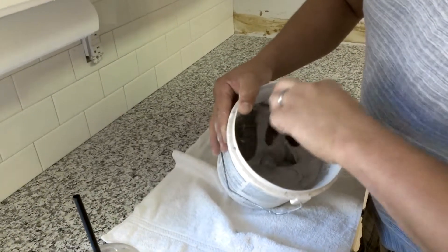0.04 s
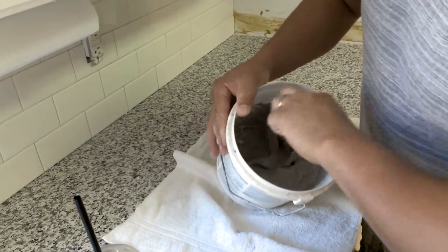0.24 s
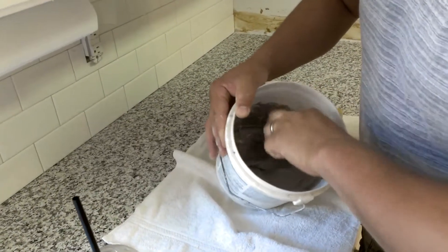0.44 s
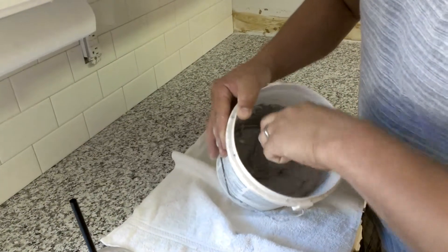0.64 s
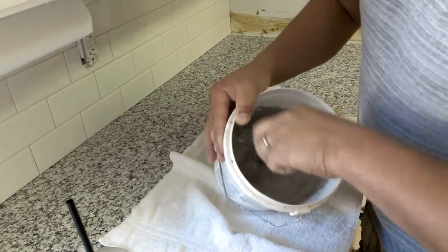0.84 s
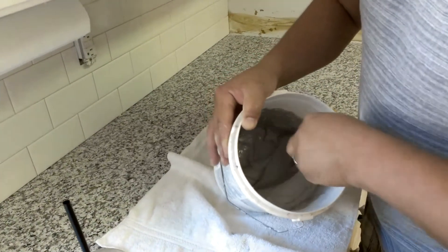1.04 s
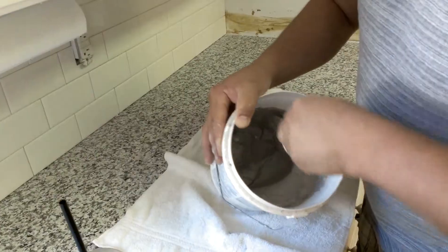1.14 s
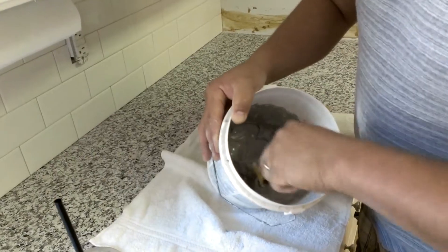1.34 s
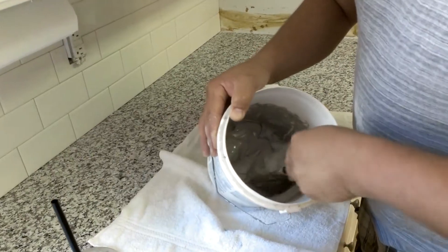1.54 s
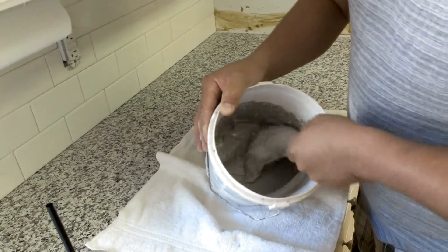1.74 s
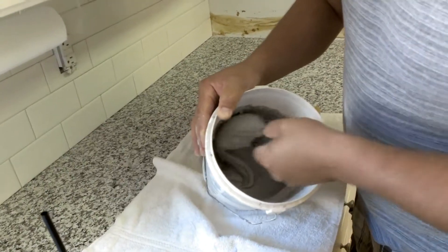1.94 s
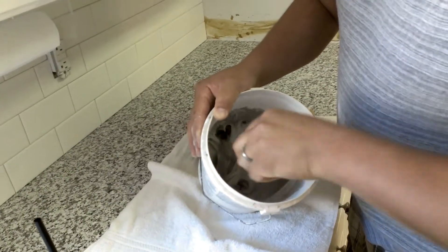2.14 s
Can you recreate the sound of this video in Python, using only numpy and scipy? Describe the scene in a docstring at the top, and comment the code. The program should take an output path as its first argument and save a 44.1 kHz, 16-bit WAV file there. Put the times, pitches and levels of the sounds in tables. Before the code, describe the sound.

Close stereo pickup of thick sandy paste being stirred in a plastic bucket; the blade clacks and rasps briefly, stops, then drags steadily with low churning and a final small knock, over very quiet room air.

```python
"""Grout stirred in a bucket

A metal spatula stirs thick grout in a small plastic bucket on a kitchen counter. The blade clacks as ringing
modes, then drags sand over the plastic in short strokes: random clicks through wall resonances. Coarse grains
snag in showers of cracks, grit crunches, and low thuds and one higher knock ring with the bucket's modes.
Behind lie a small hard room of decaying noise echoes, quiet air noise and a faint two-tone mains hum."""
import sys
import numpy as np
from scipy import signal
from scipy.fft import rfft, irfft, next_fast_len
from scipy.io import wavfile
from scipy.ndimage import uniform_filter1d

SR = 44100
rng = np.random.default_rng(int(sys.argv[2]) if len(sys.argv) > 2 else 0)


def transcribe(signal):
    """Save signal, clipped to [-1, 1], as a 16-bit WAV file at the path in sys.argv[1]."""
    frames = np.atleast_2d(signal).T
    limited = np.clip(frames, -1, 1)
    pcm = np.round(limited * 32767).astype(np.int16)
    wavfile.write(sys.argv[1], SR, pcm)


N = 97020
TIME = np.arange(N) / SR
GRAINS_PER_S, SAND_PER_S, LUMPS_PER_S = 2200, 4400, 610   # mean rates of random clicks
BUCKET_ECHO_T60_S = 0.027

# Strokes of the blade, levels before the layer gains:
# (time [s], rasp on the wall [dB], churning of the paste [dB], hiss of fine sand [dB])
STROKE_LEVELS = [
    [(0, -33, -38, -48), (.014, -38, -43, -58), (.07, -62.5, -57.5, -69)],
    [(.174, -47, -52, -55.5), (.19, -44.5, -42, -49.5), (.243, -38.5, -55, -46.5), (.248, -21.5, -32, -33),
     (.266, -11, -36, -35), (.285, -16.5, -26.5, -27.5), (.332, -20.5, -30, -35.5),
     (.366, -18, -22.5, -32.5), (.415, -20, -27, -35), (.452, -24, -34.5, -36), (.475, -30, -25.5, -45),
     (.519, -32, -32, -49), (.526, -23, -21.5, -40.5), (.558, -27.5, -24.5, -51), (.61, -53, -40, -65),
     (.67, -71.5, -77.5, -80)],
    [(1.429, -68, -26.5, -82), (1.432, -26.5, -26.5, -41.5), (1.52, -22, -22.5, -42),
     (1.562, -24.5, -26, -37.5), (1.64, -23.5, -36, -41), (1.68, -20, -35, -36.5),
     (1.704, -22, -22.5, -39.5), (1.735, -22.5, -34.5, -36), (1.754, -19, -24, -33.5),
     (1.78, -23.5, -28.5, -36.5), (1.826, -23.5, -27, -37.5), (1.88, -24, -27.5, -37.5),
     (1.935, -23.5, -30, -42), (1.994, -37, -39.5, -52), (2.012, -58, -64, -57), (2.11, -62, -63, -67.5)],
    [(2.129, -67, -57, -51), (2.133, -24.5, -26.5, -43), (2.16, -38, -32, -43), (2.175, -25.5, -37, -37),
     (2.2, -46, -32, -59)],
]
# The gap behind the blade opens and closes, tuning the paste: (time [s], resonance [Hz])
GAP_GLIDE = [(.28, 281), (.36, 460), (.43, 325), (.54, 420.7), (1.52, 390), (1.58, 313), (1.66, 395),
             (1.87, 471)]
GAP_WIDTH_HZ, BODY_DB = 56, -3.5   # BODY_DB: bucket body against gap
RASP_DB, PASTE_DB, SAND_DB = -3.5, -2.5, 1.9
JUDDER_HZ, JUDDER_DB = 88, 1.5     # stick and slip of the blade
SAND_ECHO_DB = 1                   # the hiss bounces round inside the bucket


def stroke_gains():
    """Rasp, paste and sand gains follow each stroke's levels and are silent between strokes."""
    gains = 0
    for stroke in STROKE_LEVELS:
        s, *columns = np.transpose(stroke)
        active = (TIME >= s[0]) * (TIME <= s[-1])
        gains = gains + np.array([from_db(np.interp(TIME, s, db)) for db in columns]) * active
    return gains


def churning_paste():
    """Random lumps push the bucket's body and a gliding gap resonance."""
    body = rms_one(ring(grains(LUMPS_PER_S, spread_db=2), BUCKET_BODY))
    gap = rms_one(gliding(grains(LUMPS_PER_S, spread_db=2), GAP_GLIDE, GAP_WIDTH_HZ))
    return evened(coloured(from_db(BODY_DB) * body + gap, PASTE_COLOUR), size=1100)


def stirring():
    """Grains slip under the juddering blade and rasp the wall; paste churns in the bucket; fine sand hisses."""
    rasp_gain, paste_gain, sand_gain = stroke_gains()
    judder = from_db(JUDDER_DB * wander(JUDDER_HZ))
    coarse = grains(GRAINS_PER_S, spread_db=1.5)
    rasp = evened(wall(focused(coarse * judder)), size=900)

    fine = (coarse + grains(SAND_PER_S, spread_db=0)) * judder
    bounced = from_db(SAND_ECHO_DB) * echoes(fine, BUCKET_ECHO_T60_S, 0)
    sand = evened(sandy(fine + bounced), size=900)

    out = from_db(RASP_DB) * rasp_gain * rasp
    out = out + from_db(SAND_DB) * sand_gain * sand
    return out + from_db(PASTE_DB) * paste_gain * churning_paste()


# Resonances of the wall under the blade: (frequency [Hz], width [Hz], mean level [dB])
WALL_RESONANCES = [(942, 160, -1.5), (1201.5, 62, 1), (1282, 63, 0.5), (1468, 232, -2.5), (1794, 152, -0.5),
                   (2102, 160, -1), (2438, 188, 2), (2603, 407, -5.5)]
# Colour of the rasp: (frequency [Hz], gain [dB])
RASP_COLOUR = [(100, -26), (300, -12), (750, 0.5), (1500, -3.5), (2500, -1), (3200, -1.5), (4500, -12.5),
               (8000, -30), (16000, -50)]
WALL_SHIFT_DB, WALL_SHIFT_HZ = 2.5, 7.04   # each resonance swells and fades as the blade travels


def wall(x):
    """The broad resonances of the plastic wall, each driven more or less as the blade moves on."""
    out = 0
    for k, (hz, width, db) in enumerate(WALL_RESONANCES):
        gain = from_db(db + WALL_SHIFT_DB * wander(WALL_SHIFT_HZ))
        sign = (-1) ** k   # neighbours alternate in polarity
        out = out + sign * gain * signal.lfilter(*resonance(hz, width), x + 1e-18)
    return coloured(out, RASP_COLOUR)


# Resonance of the rasp, lower as the blade buries itself in paste: (time [s], centre [Hz])
RASP_GLIDE = [(0, 1250), (.179, 2070), (.273, 2050), (.318, 1690), (.6, 1187), (1.62, 1796), (1.89, 1700),
              (1.945, 1190)]
FOCUS_WIDTH_HZ, FOCUS_DB = 890, 11


def focused(x):
    """A broad resonance that glides with the blade's depth lifts part of the rasp."""
    return x + from_db(FOCUS_DB) * gliding(x, RASP_GLIDE, FOCUS_WIDTH_HZ)


# Colour of cracking sand: (frequency [Hz], gain [dB])
SAND_COLOUR = [(500, -26.5), (2500, 5.5), (4100, 5), (5400, 0.5), (6500, -6), (8200, -3), (9800, -9.5),
               (11500, -15.5), (15500, -28)]


def sandy(x):
    """The bright colour of cracking sand."""
    return coloured(x, SAND_COLOUR)


# The blade's edge chatters and a patch of wall groans:
# one list per groan of (time [s], centre [Hz], level before GROAN_DB [dB])
GROAN_GLIDES = [
    [(.29, 1543, -16.5), (.365, 1520, -63), (.379, 1616, -16), (.42, 1560, -34.5)],
    [(1.44, 940, -33), (1.62, 870, -39.5), (1.77, 1047, -28.5), (1.93, 965, -30.5), (2.05, 884, -51.5)],
    [(1.915, 1360, -38), (1.934, 1348, -29.5), (2.07, 1210, -60)],
]
GROAN_WIDTH_HZ, GROAN_DB = 52, -1.5


def groans():
    """Slipping grains drive one narrow, gliding resonance of the wall into a rough tone."""
    out = 0
    for rows in GROAN_GLIDES:
        s, hz, db = np.transpose(rows)
        narrow = gliding(grains(GRAINS_PER_S, spread_db=0.5), rows, GROAN_WIDTH_HZ)
        tone = gliding(narrow, rows, FOCUS_WIDTH_HZ)
        level = from_db(GROAN_DB + np.interp(TIME, s, db)) * (TIME >= s[0]) * (TIME <= s[-1])
        out = out + level * evened(tone, size=600)
    return out


# The blade clacks against the wall: (time [s], strike level [dB])
CLACK_HITS = [(.2450, -7), (.2536, -6.5), (.2607, -5), (.2644, -5.5), (.2872, -16), (.4557, -17.5)]
# Blade pressed on the wall: (frequency [Hz], level [dB], time to fall 60 dB [s])
PRESSED_BLADE = [(1500, -14, .1), (2007, -17.5, .09), (2090, -22.5, 0.16), (2368, -9, 0.11),
                 (2470, 0.5, 0.012), (2810, -16.5, 0.05)]
CLACK_DB, CLACK_TICK_DB = 0.5, -24.5


def clacks():
    """Hard touches ring the blade and crack the sand under it."""
    hits = clicks(CLACK_HITS)
    blade = from_db(CLACK_DB) * blade_band(ring(hits, PRESSED_BLADE))
    return blade + from_db(CLACK_TICK_DB) * crumbling(hits, sandy)


BLADE_LOW_HZ, BLADE_HIGH_HZ = 1750, 2973


def blade_band(x):
    """The thin blade radiates neither bass nor much treble."""
    band = signal.butter(2, [BLADE_LOW_HZ, BLADE_HIGH_HZ], "band", fs=SR, output="sos")
    return signal.sosfilt(band, x + 1e-18)


# The blade snags on a coarse grain: (time [s], level [dB])
SNAG_HITS = [(.364, -13), (.3755, -6.5), (.523, -21.5), (1.431, -24.5), (1.509, -18.5), (1.781, -13.5),
             (1.921, -11), (2.1335, -29.5)]
SNAG_DB, SNAG_TICK_DB = -4, -15


def snags():
    """A coarse grain is crushed against the wall."""
    hits = clicks(SNAG_HITS)
    crush = from_db(SNAG_DB) * crumbling(hits, lambda x: wall(focused(x)))
    return crush + from_db(SNAG_TICK_DB) * crumbling(hits, sandy)


def crumbling(hits, shape, rise_s=.0005, decay_s=0.0062):
    """Each click sets off a swelling and dying shower of tiny cracks, heard through the given filter."""
    rise, fall = np.exp(-1 / (np.array([rise_s, decay_s]) * SR))
    envelope = signal.lfilter([1 - rise], np.convolve([1, -rise], [1, -fall]), hits + 1e-18)
    return envelope * evened(shape(grains(SAND_PER_S, spread_db=5.5)), size=220)


# Low thuds and one higher knock: (time [s], level [dB], ringing pitch [Hz])
THUD_HITS = [(0.463, -15.5, 374), (.548, -21.5, 419), (1.405, -43.5, 390), (1.753, -16.5, 411),
             (2.1347, -26, 488), (2.135, -16.5, 1360), (2.137, -21, 741)]
# Bucket with its load of paste: (frequency [Hz], level [dB], time to fall 60 dB [s])
BUCKET_BODY = [(245, -17.5, 0.24), (327.7, -6.5, 0.11), (378, -6, 0.062), (429.6, -0.5, 0.097),
               (473, -6.5, 0.013), (743, -9, 0.063)]
# Colour of the paste: (frequency [Hz], gain [dB])
PASTE_COLOUR = [(25, -36), (70, -12), (150, -8.5), (300, -3.5), (480, -0.5), (600, -3.5), (750, -0.5),
                (1200, -16), (4000, -44.5)]
THUD_DB, THUD_TONE_T60_S, THUD_TONE_DB = -6, 0.095, 4.5


def thuds():
    """Each hit rings a dying sine at its own pitch and pushes the bucket's low modes."""
    tones = 0
    for s, db, hz in THUD_HITS:
        tones = tones + ring(clicks([(s, db)]), [(hz, THUD_TONE_DB, THUD_TONE_T60_S)])
    body = ring(clicks([(s, db) for s, db, hz in THUD_HITS]), BUCKET_BODY)
    return from_db(THUD_DB) * coloured(tones + body, PASTE_COLOUR)


# A clump of grit is smeared along the wall: (time [s], level [dB], pitch [Hz])
GRIT_CLUMPS = [(0.546, -41.5, 9300), (1.551, -31.5, 3560), (1.602, -29.5, 3000), (1.748, -38, 6660),
               (1.836, -32, 4000), (1.871, -31.5, 2900)]
CLUMP_WIDTH_SHARE = 0.13   # resonance width over its pitch
CLUMP_RISE_S, CLUMP_DECAY_S, CLUMP_DB = 0.0011, 0.012, 1.5


def clumps():
    """Each clump of grit gives a short, bright crunch with a pitch of its own."""
    out = 0
    for s, db, hz in GRIT_CLUMPS:
        b, a = resonance(hz, CLUMP_WIDTH_SHARE * hz)
        pitched = lambda x: signal.lfilter(b, a, x + 1e-18)
        out = out + crumbling(clicks([(s, db)]), pitched, CLUMP_RISE_S, CLUMP_DECAY_S)
    return from_db(CLUMP_DB) * out


# The blade brushes the wall between strokes: (time [s], level [dB])
BRUSH_HITS = [(.9675, -44), (.972, -38), (1.147, -49.5), (1.403, -45)]
# The blade's tip, touched lightly: (frequency [Hz], level [dB], time to fall 60 dB [s])
BLADE_TIP = [(2010, -2, 0.036), (2570, -15, 0.059)]
BRUSH_DB, BRUSH_TICK_DB, TIP_DB = -6, -15, -5


def brushes():
    """Light, gritty touches that ring only the blade's tip."""
    hits = clicks(BRUSH_HITS)
    grit = from_db(BRUSH_DB) * crumbling(hits, lambda x: blade_band(wall(x)))
    ticks = from_db(BRUSH_TICK_DB) * crumbling(hits, sandy)
    return grit + ticks + from_db(TIP_DB) * blade_band(ring(hits, BLADE_TIP))


RUB_START_S, RUB_END_S, RUB_DB = .175, .245, -36.5   # a light rub just before the first clack


def rub():
    """Fine grains slide under the bare blade."""
    active = (TIME > RUB_START_S) * (TIME < RUB_END_S)
    slide = blade_band(wall(grains(SAND_PER_S, spread_db=1)))
    return from_db(RUB_DB) * active * evened(slide, size=900)


# Colour of the room air: (frequency [Hz], gain [dB])
AIR_COLOUR = [(25, -29), (50, -2), (330, 1.5), (500, -9), (1300, -16), (4000, -24)]
# Mains hum: (frequency [Hz], rms level [dB])
HUM_TONES = [(59.5, -62), (120, -69)]
AIR_DB = -60


def background():
    """Quiet room air is coloured noise, partly different on each side; mains hum is steady sines."""
    mid, side = rms_one(coloured(rng.standard_normal((2, N)), AIR_COLOUR))
    air = from_db(AIR_DB) * (mid + coloured(side, SIDE_SPREAD) * [[1], [-1]])
    hum = 0
    for hz, db in HUM_TONES:
        hum = hum + np.sqrt(2) * from_db(db) * np.sin(2 * np.pi * (hz * TIME + rng.random()))
    return air + hum


def from_db(db):
    """Decibels to gain."""
    return 10 ** (np.asarray(db) / 20)


def rms_one(x):
    """Scale to unit power."""
    return x / np.sqrt(np.mean(x ** 2) + 1e-20)


def evened(x, size):
    """Hold the power near one over a window of samples, keeping the finer grain."""
    power = np.abs(uniform_filter1d(x ** 2, size))
    return x / np.sqrt(power + 1e-4 * np.mean(x ** 2))


def grains(per_s, spread_db):
    """Random clicks of either polarity, most small and a few large."""
    sizes = from_db(spread_db * np.minimum(rng.exponential(1, N), 4)) * rng.choice([-1, 1], N)
    return sizes * (rng.random(N) < per_s / SR)


def clicks(rows):
    """One click for each (time [s], level [dB]) row."""
    out = np.zeros(N)
    for s, db in rows:
        out[int(np.clip(s * SR, 0, N - 1))] += from_db(db)
    return out


def wander(hz):
    """A random swing of unit spread, with little movement faster than hz."""
    lowpass = signal.butter(2, hz, fs=SR, output="sos")
    return rms_one(signal.sosfilt(lowpass, rng.standard_normal(N)))


def ring(x, modes):
    """Each mode answers a unit click with a dying sine."""
    out = 0
    for hz, db, t60 in modes:
        r, w = from_db(-60 / (t60 * SR)), 2 * np.pi * hz / SR
        sine = signal.lfilter([0, np.sin(w)], [1, -2 * r * np.cos(w), r * r], x + 1e-18)
        out = out + from_db(db) * sine
    return out


def resonance(hz, width_hz):
    """Filter coefficients of one resonance, with unit gain on top."""
    r = np.exp(-np.pi * width_hz / SR)
    return np.array([1, 0, -1]) * (1 - r * r) / 2, [1, -2 * r * np.cos(2 * np.pi * hz / SR), r * r]


def gliding(x, points, width_hz):
    """A resonance whose centre follows a (time [s], centre [Hz]) curve, in steps of 128 samples."""
    s, hz = np.transpose(points)[:2]
    state, out = np.zeros(2), np.zeros(N)
    for i in range(0, N, 128):
        b, a = resonance(np.interp(i / SR, s, hz), width_hz)
        out[i:i + 128], state = signal.lfilter(b, a, x[i:i + 128], zi=state)
    return out


def coloured(x, points, share=1):
    """Causal (minimum-phase) filter that follows a share of a (frequency [Hz], gain [dB]) curve."""
    size = 2 * next_fast_len(N)
    hz, db = np.transpose(points)
    curve = share * np.interp(np.log(np.arange(size // 2 + 1) * SR / size + 1), np.log(hz), db)
    # folding the cepstrum onto positive time gives the minimum phase
    cepstrum = irfft(np.log(from_db(curve)))
    cepstrum[1:size // 2] *= 2
    cepstrum[size // 2 + 1:] = 0
    return irfft(rfft(x, size) * np.exp(rfft(cepstrum)))[..., :N]


def echoes(x, t60, delay_s):
    """Dense reflections of unit energy that die away."""
    tail = rng.standard_normal(N) * from_db(-60 * TIME / t60) * (TIME >= delay_s)
    return signal.fftconvolve(x, tail / np.linalg.norm(tail))[:N]


# Colour of what differs between the microphones: (frequency [Hz], side gain [dB])
SIDE_SPREAD = [(400, -14.5), (750, -11.5), (1300, -3), (4400, -1)]
# Tilt between the microphones, of which each takes a share: (frequency [Hz], left over right [dB])
LEFT_RIGHT_TILT = [(740, 1), (1400, 1.5), (2700, 0), (4900, -7.5), (7000, 8.5)]
ROOM_T60_S, ROOM_DB, ROOM_DELAY_S = 0.24, -11, 0.0074
SIDE_GRAIN_DB, SIDE_ECHO_DB, SIDE_ROOM_DB = -5, -11.5, -12


def scene():
    """Two microphones hear the bucket directly, off its walls and through the room, with some grains each."""
    direct = stirring() + groans() + clacks() + snags() + thuds() + clumps() + brushes() + rub()
    mid = direct + from_db(ROOM_DB) * echoes(direct, ROOM_T60_S, ROOM_DELAY_S)

    # fresh random grains and echoes, added on the left and subtracted on the right
    side = from_db(SIDE_GRAIN_DB) * (stirring() + groans() + clumps())
    side = side + from_db(SIDE_ECHO_DB) * echoes(direct, BUCKET_ECHO_T60_S, 0)
    side = side + from_db(SIDE_ROOM_DB) * echoes(direct, ROOM_T60_S, ROOM_DELAY_S)
    side = coloured(side, SIDE_SPREAD)

    left = coloured(mid + side, LEFT_RIGHT_TILT, share=0.42)
    right = coloured(mid - side, LEFT_RIGHT_TILT, share=-0.39)
    return np.array([left, right]) + background()


CUTOFF_HZ = 15900


def record(dry):
    """Peaks are rounded and the top is cut."""
    rounded = dry / (1 + (dry / .85) ** 4) ** .25
    return signal.sosfilt(signal.ellip(12, .1, 90, CUTOFF_HZ, fs=SR, output="sos"), rounded)


dry = scene()
out = record(dry)
transcribe(out)
```